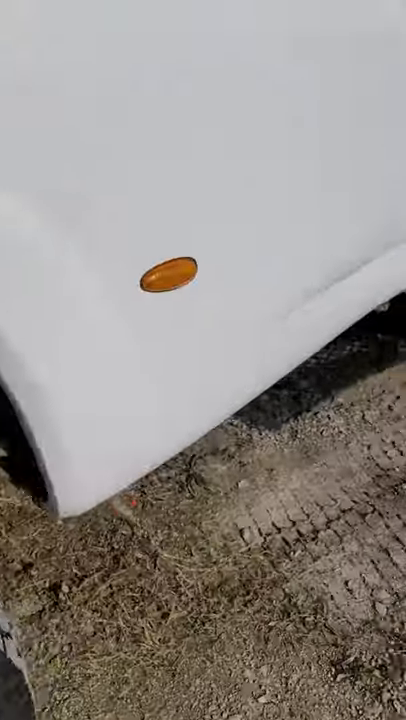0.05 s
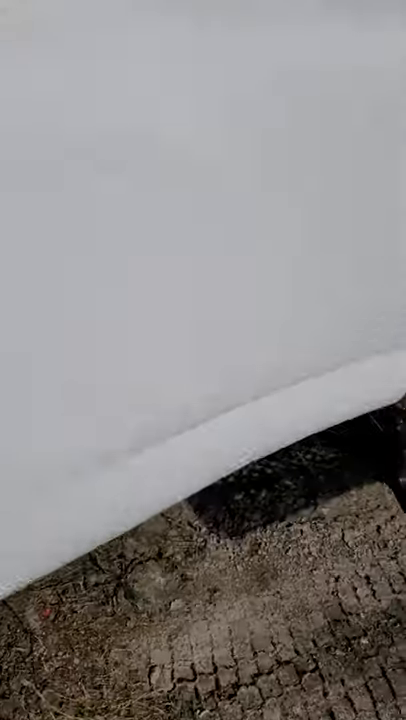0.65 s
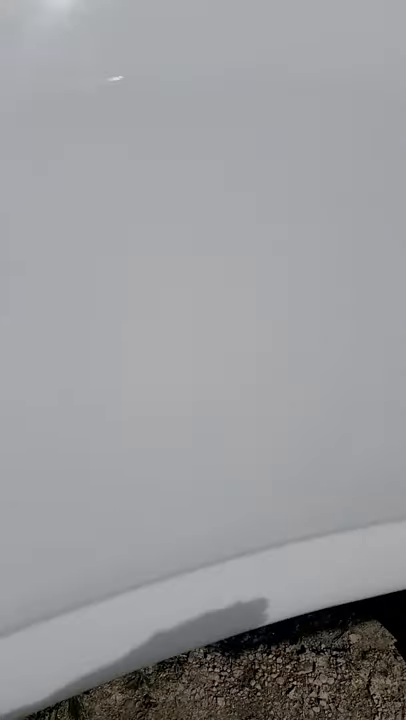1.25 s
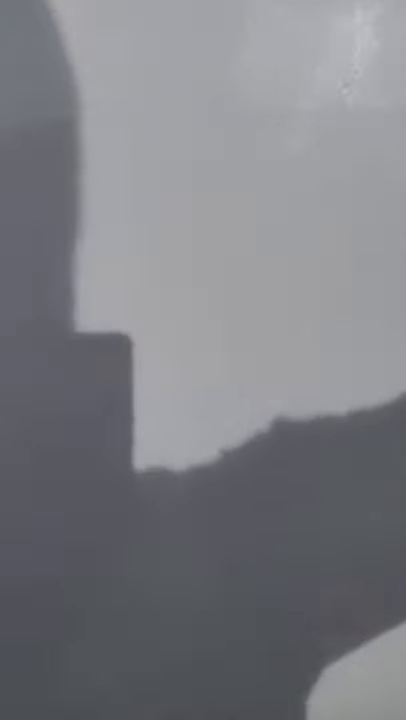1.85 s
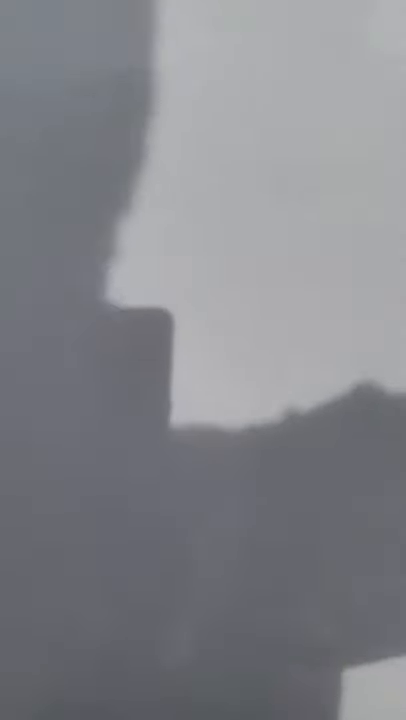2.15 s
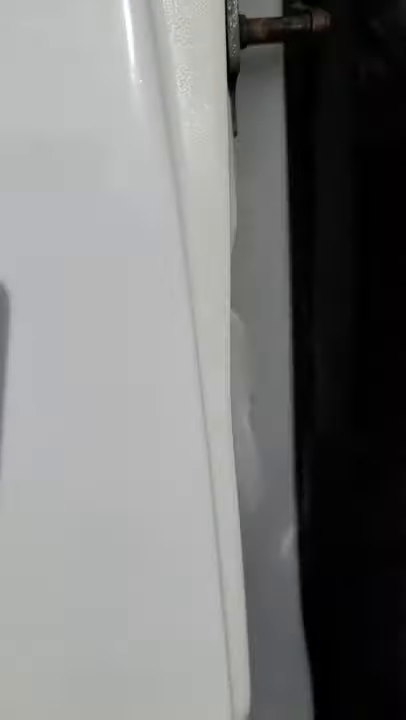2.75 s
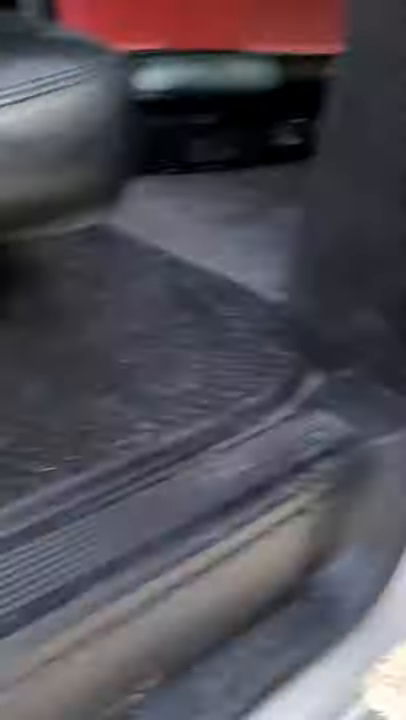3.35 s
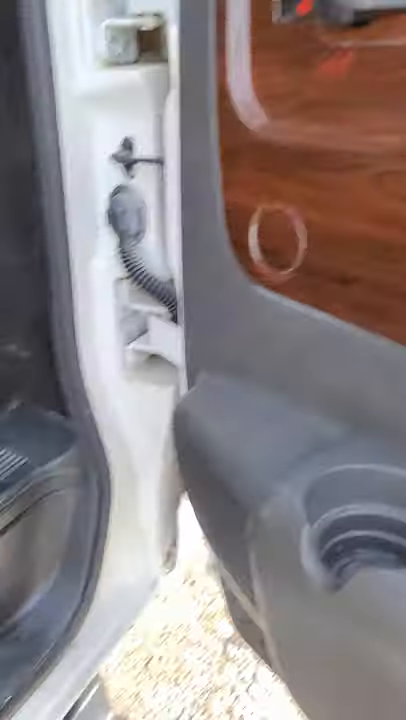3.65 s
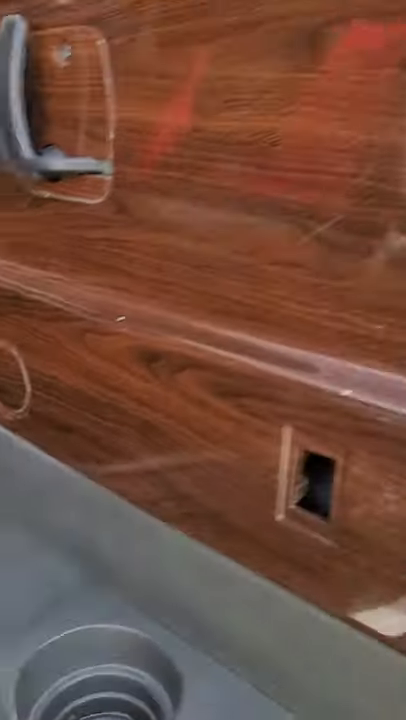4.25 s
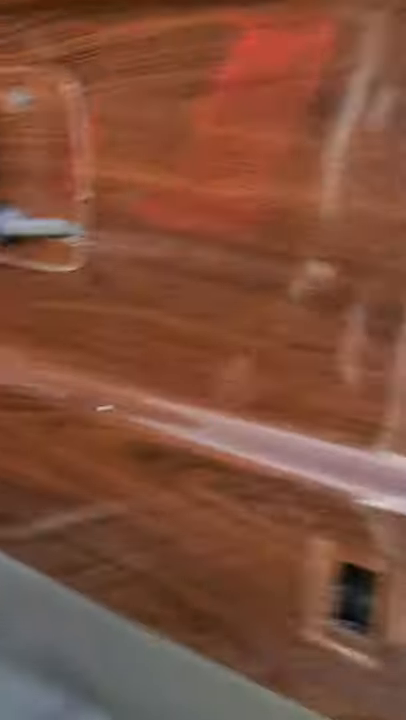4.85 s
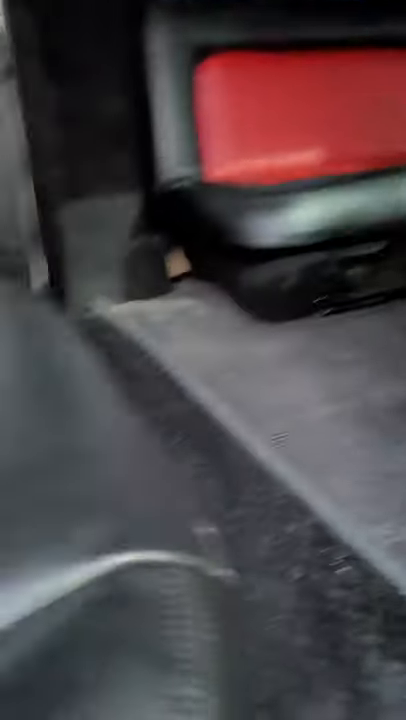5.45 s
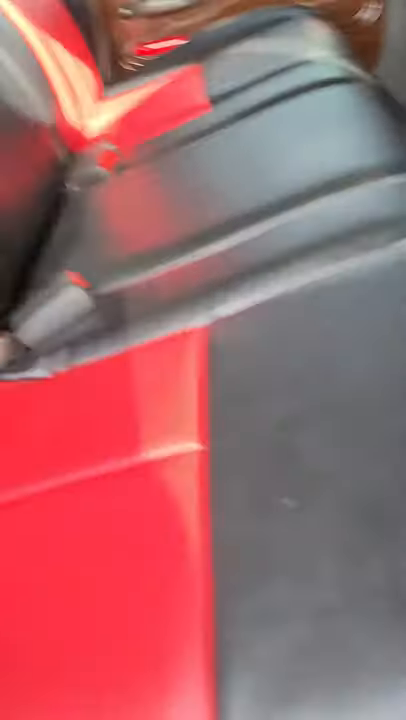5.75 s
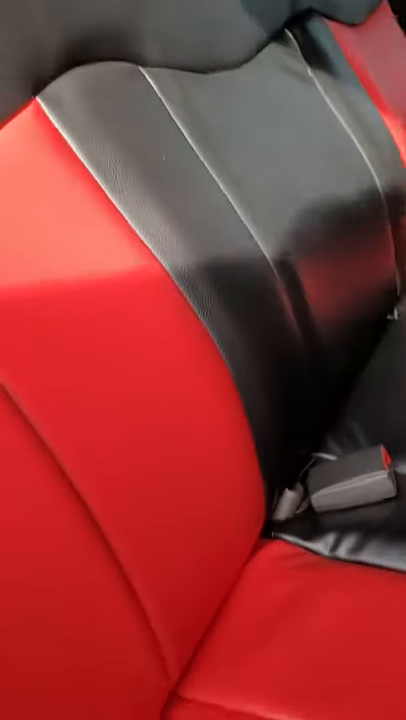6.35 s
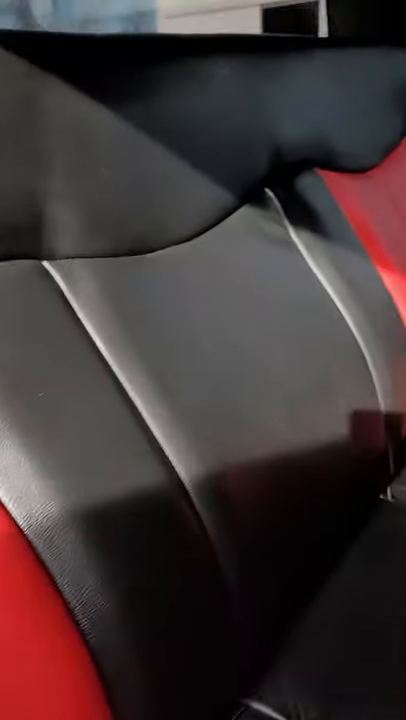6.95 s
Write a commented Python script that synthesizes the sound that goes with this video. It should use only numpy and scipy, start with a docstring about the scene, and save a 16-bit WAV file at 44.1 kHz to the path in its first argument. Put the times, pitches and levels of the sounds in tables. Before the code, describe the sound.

Over an idling engine and low wind rumble, a car door is opened with clicks and clunks, followed by knocks and soft clothing rustle.

```python
"""Opening a limousine door

Someone with a phone walks up, pulls the handle, swings the door open and leans inside.
The latch lets go with a thump, catch and hinge stay clack in the door shell, trim ticks, clothes rub.
An engine drones steadily outside and light wind buffets the microphones."""
import sys
import numpy as np
from scipy import signal
from scipy.fft import rfft, irfft
from scipy.io import wavfile
from scipy.ndimage import uniform_filter1d

SR = 44100
rng = np.random.default_rng(int(sys.argv[2]) if len(sys.argv) > 2 else 0)


def transcribe(u):
    """Save the signal u as a 16-bit wav file named by the first command-line argument.

    u: samples, shape (n,) or (channels, n), limited to [-1, 1]; the rate is SR.
    q: integer samples, one column per channel.
    """
    v = np.clip(np.atleast_2d(u).T, -1, 1)
    q = np.round(v * 32767).astype(np.int16)
    wavfile.write(sys.argv[1], SR, q)


N = 317696
TIME_S = np.arange(N) / SR
RING_TIME_S = TIME_S[:SR // 2]
FREQ_HZ = np.maximum(np.fft.rfftfreq(N, 1 / SR), 1)


def undb(db):
    """Decibels to gain."""
    return 10 ** (np.asarray(db) / 20)


def unit(x):
    """Scale to rms 1."""
    return x / np.sqrt(np.mean(x ** 2))


def curve(points):
    """Level in dB per sample from (s, dB) points."""
    return np.interp(TIME_S, *np.transpose(points))


def colour(points):
    """Gain per frequency from (Hz, dB) points."""
    hz, db = np.transpose(points)
    return undb(np.interp(np.log(FREQ_HZ), np.log(hz), db))


def band(low_hz, high_hz, order=6):
    """Gain per frequency of a band-pass."""
    return 1 / np.sqrt((1 + (low_hz / FREQ_HZ) ** (2 * order)) * (1 + (FREQ_HZ / high_hz) ** (2 * order)))


def resonances(peaks):
    """Gain per frequency from (Hz, width Hz, dB) peaks."""
    return undb(sum(db / (1 + (2 * (FREQ_HZ - hz) / width) ** 2) for hz, width, db in peaks))


def noise(gain, correlation):
    """Coloured stereo noise, mid signal at rms 1."""
    mid, side = rfft(rng.standard_normal((2, N))) * gain
    correlation = np.clip(correlation, -0.9, 0.99)
    mid = irfft(mid * np.sqrt(1 + correlation), N)
    side = irfft(side * np.sqrt(1 - correlation), N)
    return np.array([mid + side, mid - side]) / np.std(mid)


def pan(left_db):
    """Left and right gains with mean 1."""
    gains = undb(np.array([[left_db], [-left_db]]) / 2)
    return gains / gains.mean()


def wander(rate_hz):
    """Smooth random drift, rms 1."""
    hold = int(SR / rate_hz)
    steps = np.repeat(rng.standard_normal(N // hold + 1), hold)
    return unit(uniform_filter1d(steps, hold)[:N])


def add(out, start_s, sound):
    """Mix a sound in at start_s."""
    i = int(start_s * SR)
    out[:, i:i + sound.shape[1]] += sound[:, :N - i]


def burst(source, start_s, db, t60_s, rise_s, tail_db=-20, tail_stretch=3.7):
    """Crowded modes swell and die away, with a weaker, longer cabin tail."""
    t = RING_TIME_S
    fade = undb(-60 * t / t60_s) + undb(tail_db - 60 * t / (t60_s * tail_stretch))
    x = source[:, int(start_s * SR):][:, :len(t)] * fade * (1 - np.exp(-t / rise_s))
    return undb(db) * x * np.linalg.norm(fade) / np.linalg.norm(x.mean(0))


def ring(modes, rise_s=0.00043):
    """Decaying (Hz, dB, t60 s) modes; higher ones differ more in phase between channels."""
    t, out = RING_TIME_S, 0
    for hz, db, t60_s in modes:
        phase = 2 * np.pi * (rng.random() + min(hz / 4000, 0.5) * rng.random((2, 1)))
        out = out + undb(db - 60 * t / t60_s) * np.sin(2 * np.pi * hz * t + phase)
    return out * (1 - np.exp(-t / rise_s))


def hiss(gain_db=3):
    """Faint treble hiss."""
    # Each row: time in seconds, level in dB before gain.
    levels = [(0.0, -79.5), (2.67, -80), (3.75, -85), (4.46, -75), (5.0, -79)]
    spectrum = colour([(7000, 2.5), (9500, -3), (13000, 4.5)]) * band(3500, 13000)
    return noise(spectrum, 0) * undb(curve(levels) + gain_db) * pan(-3.5)


def engine(hum_hz=92.8, hum_gain_db=1, drone_db=-45.5, fall_db_per_s=0.36):
    """An idling engine: wavering hum, and a broad drone that eases as the phone moves behind the door."""
    # Each row: time in seconds, level in dB before gain.
    hum_levels = [(0.0, -43), (1.0, -48.5), (2.15, -36.5), (2.32, -44), (3.85, -42.5), (4.11, -51),
                  (5.41, -49), (6.36, -62), (6.88, -49.5), (7.2, -55)]
    # Each row: frequency in Hz, density in dB.
    drone_spectrum = [(150, -28), (250, -1), (414, -4), (460, -3), (538, -5), (651, -1), (816, -5.5),
                      (1120, -6.5), (1640, -10.5), (2130, -18), (3910, -35.5), (6940, -45.5), (9830, -63),
                      (13700, -35), (16000, -52)]
    # Each row: centre in Hz, width in Hz, boost in dB.
    drone_peaks = [(730, 34, 1.5), (827, 160, 3.5), (1284, 400, 2.5)]
    phase = 2 * np.pi * np.cumsum(hum_hz + 1.278 * wander(6.7)) / SR
    hum = unit(np.sin(phase)) * undb(curve(hum_levels) + hum_gain_db + 1.5 * wander(8.2))
    correlation = np.interp(FREQ_HZ, [500, 1200, 2500], [0.8, 0.5, 0.05])
    drone = noise(colour(drone_spectrum) * resonances(drone_peaks) * band(258, 5000, order=3), correlation)
    drone *= undb(drone_db - fall_db_per_s * TIME_S + wander(12))
    return hum * pan(1.5) + drone * pan(1)


def wind(gain_db=7, gust_db=2.1):
    """Gusty rumble; the slowest eddies hit each microphone separately."""
    # Each row: frequency in Hz, density in dB.
    spectrum = [(12, -37), (20, -10), (49, 0), (74, -1), (97, -6), (119, -10), (177, -14.5), (211, -20.5),
                (366, -38.5), (400, -33), (520, -66), (880, -120)]
    # Each row: time in seconds, level in dB before gain.
    levels = [(0.0, -43), (0.98, -48), (2.04, -41.5), (5.05, -48.5), (5.55, -42.5), (5.81, -48),
              (6.72, -53.5), (6.96, -51), (7.2, -51.5)]
    correlation = np.interp(FREQ_HZ, [35, 120], [0.1, 0.65])
    rumble = noise(colour(spectrum) * band(24, 360, order=4), correlation)
    return rumble * undb(curve(levels) + gain_db + gust_db * wander(11)) * pan(1.4)


def puffs(band_ratio=1.59, centred_db=-36.5):
    """Short eddies and handling bumps, a few low cycles each; louder ones lean left."""
    # Each row: centre in seconds, level in dB, half length in seconds, band centre in Hz.
    eddies = [(0.085, -25, 0.018, 56), (0.18, -33, 0.012, 100), (0.266, -31.5, 0.014, 104),
              (0.813, -32, 0.021, 166), (1.401, -31.5, 0.02, 96), (1.533, -26.5, 0.035, 83.4),
              (2.374, -36, 0.011, 315), (2.616, -27, 0.0091, 107), (3.177, -26.5, 0.011, 81),
              (5.45, -22, 0.0096, 133), (5.487, -16.5, 0.016, 93), (6.039, -38.5, 0.038, 168),
              (6.906, -38.5, 0.049, 50)]
    out = np.zeros((2, N))
    for centre_s, db, half_s, hz in eddies:
        swell = np.exp(-((TIME_S - centre_s) / half_s) ** 2 / 2)
        eddy = noise(band(hz / band_ratio, hz * band_ratio, order=4), 0.56) * swell
        out += undb(db) * unit(eddy) * np.sqrt(np.mean(swell ** 2)) * pan(db - centred_db)
    return out


def rubbing(edge_s=0.098, flicker_db=1, body_db=-8, grain_db_per_db=0.1976):
    """Cloth fibres catch and slip; slow, dull strokes are grainier and stir the panel."""
    # Clothes and hand. Each row: start and end in seconds, level in dB, brightness in dB.
    strokes = [(.41, 0.61, -65, -3.5), (1.04, 1.248, -72, -3.5), (1.875, 2.064, -56, -17),
               (2.194, 2.283, -52.5, -12), (2.347, 2.48, -64, -11), (2.512, 3.015, -65.5, -14.5),
               (4.908, 5.45, -66.5, -5.5), (5.14, 5.37, -53.5, -11), (5.765, 5.816, -59, -14),
               (5.979, 6.09, -57, -15), (6.044, 6.114, -50, -10.5), (6.122, 6.17, -56.5, -8),
               (6.723, 7.076, -53.5, -1), (7.05, 7.245, -63, -9)]
    # Each row: frequency in Hz, density in dB.
    cloth_spectrum = [(1400, 4), (2150, -0.5), (2460, -1), (2830, -1), (3300, -3), (5000, -7.5), (6200, -6),
                      (8700, -8.5)]
    # Each row: centre in Hz, width in Hz, boost in dB.
    upholstery_peaks = [(2770, 370, 4), (6300, 900, 2), (13500, 3500, 4.5)]
    creak = resonances(upholstery_peaks)
    treble = noise(colour(cloth_spectrum) * creak * band(910, 7500), -0.072) * pan(-1.1)
    top = noise(creak * band(8100, 24000), 0) * pan(-9.5)
    body = noise(band(200, 840, order=2), 0.51) * undb(body_db)
    out, catch = np.zeros((2, N)), wander(350)
    for start_s, end_s, db, bright_db in strokes:
        span = slice(int(start_s * SR), int(end_s * SR))
        t = TIME_S[span]
        ramp = np.minimum(t - start_s, end_s - t) / min(edge_s, (end_s - start_s) / 2)
        contact = np.sin(np.pi / 2 * np.clip(ramp, 0, 1))
        grain_db = -grain_db_per_db * bright_db * catch[span]
        friction = undb(-bright_db) * body[:, span] + treble[:, span] + undb(bright_db) * top[:, span]
        out[:, span] += undb(db + grain_db) * contact * friction
    return out * undb(flicker_db * wander(1500))


def ticks(treble, top, t60_s=0.045, rise_s=0.0005, walk_s=1.3, grit_count=12):
    """Latch pawl and trim stir only the shell's treble; grit crunches faintly on the walk up."""
    # Each row: start in seconds, treble level in dB, top band against treble in dB.
    contacts = [(0.293, -69, 7), (1.2346, -64, -12), (1.759, -53.5, -19), (1.956, -48.5, -8),
                (2.0223, -50, -24), (2.0506, -50.5, -21), (2.1205, -37.5, -7.5), (2.2233, -48.5, -8),
                (2.9926, -53.5, -22), (4.0602, -70.5, 8.5), (4.376, -59, -5), (4.597, -52, -2),
                (5.2964, -32.5, -13), (5.3414, -55, -6), (5.384, -47.5, -8.5), (5.5683, -57.5, -10),
                (5.7737, -51.5, -18), (6.0212, -55, -14)]
    grit = [(when * walk_s, -73.5 + 5 * (2 * size - 1), 2.5) for when, size in rng.random((grit_count, 2))]
    out = np.zeros((2, N))
    for start_s, db, bright_db in contacts + grit:
        add(out, start_s, burst(treble, start_s, db, t60_s, rise_s))
        add(out, start_s, burst(top, start_s, db + bright_db, t60_s, rise_s))
    return out


def metalwork(stay_s=3.4195, stay_db=-18.5, loose_s=5.251, ping_t60_s=0.028):
    """The hinge stay drops into its notch, a loose piece rings on, small struck parts ping."""
    # Each row of both: frequency in Hz, level in dB (stay: relative to stay_db), t60 in seconds.
    stay_modes = [(700, -0.5, 0.098), (733, 1, 0.073), (1235, -2, 0.074), (1435, -2.5, 0.059),
                  (1990, -14.5, 0.059), (3470, -11.5, 0.036), (3830, -12, 0.053), (4480, -11.5, 0.024),
                  (4820, -14, 0.036), (5390, -11.5, 0.026)]
    loose_modes = [(4230, -42.5, 0.1), (7300, -49, .09), (11150, -46, 0.13)]
    # Each row: start in seconds, frequency in Hz, level in dB.
    pings = [(1.860, 3940, -28), (1.860, 2440, -31.5), (2.122, 6550, -29.5), (2.123, 1455, -30),
             (2.576, 1900, -29), (2.599, 2520, -29), (2.839, 6340, -34.5), (2.994, 1320, -30.5),
             (4.598, 5670, -42), (5.305, 2730, -25), (5.385, 2840, -37)]
    out = np.zeros((2, N))
    add(out, stay_s, undb(stay_db) * ring(stay_modes))
    add(out, loose_s, ring(loose_modes))
    for start_s, hz, db in pings:
        add(out, start_s, ring([(hz, db, ping_t60_s)]))
    return out


def latch_release(start_s=2.1203, gain_db=-5.5, seal_cutoff_hz=486):
    """The compressed seal shoves the freed door into its low modes; soft rubber passes no treble."""
    # Each row: frequency in Hz, relative level in dB, t60 in seconds.
    panel_modes = [(87, -11, 0.2), (131, 0, 0.069), (172, -14.5, 0.38), (311, -14, 0.07), (438, -8, 0.021),
                   (684, -2, 0.15)]
    out, t = np.zeros((2, N)), RING_TIME_S
    panel = sum(undb(db - 60 * t / t60_s) * np.cos(2 * np.pi * hz * t) for hz, db, t60_s in panel_modes)
    thump = signal.sosfilt(signal.butter(10, seal_cutoff_hz, fs=SR, output="sos"), panel)
    add(out, start_s, undb(gain_db) * thump[None])
    return out


def door(rise_s=0.0013, hand_damping=0.92):
    """Handle, catch and stay strike the hand-damped shell: dense clacks, ringing modes, light ticks."""
    # Each row: start in seconds, level in dB, weight in dB, bare sheet metal clack in dB.
    blows = [(1.858, -38.5, -4, 1.5), (2.171, -36, 1.5, -8), (2.573, -42, -5, 0), (2.59, -40, 2, -4),
             (2.67, -29.5, 2.5, 9), (2.84, -36.5, 3.5, -6), (3.418, -31, 0.5, 6), (5.164, -39, -0.5, -1),
             (5.187, -29, -8.5, -10.5), (5.202, -33.5, -2, 3.5), (5.299, -23, -4, -1)]
    # Each row: frequency in Hz, density in dB.
    shell_spectrum = [(47, -29), (80, 5), (217, 1.5), (563, -7.5), (802, 3.5), (1000, -7), (1560, -1.5),
                      (2080, -15.5), (3030, -17), (3320, -20.5), (3870, -22), (7050, -33.5), (9400, -54),
                      (14600, -44), (16000, -48)]
    # Each row: low and high edge in Hz, t60 in seconds before damping, left-right correlation.
    shell_bands = [(98, 226, 0.21, 1), (244, 567, 0.25, 0.69), (602, 2460, 0.09, -0.31),
                   (2280, 17000, 0.052, -0.0038), (8860, 10800, 0.043, 0)]
    # Each row, one per band: offset in dB, dB per dB of weight, dB per dB of clack.
    band_feeds = [(1, 1, -0.72), (0, 1.86, 0), (0, 0, 1), (0, 0, 0), (-14.5, 0, -0.7)]
    # Each row: frequency in Hz, relative level in dB, t60 in seconds before damping.
    shell_modes = [(168, 2.5, 0.11), (255, -25.5, 0.87), (408, -1.5, 0.049), (692, -25, 0.73),
                   (837, 7.5, 0.025), (1126, -3, 0.089), (1490, -22, .09), (1855, -6, 0.086),
                   (2263, -4.5, 0.066), (2530, -16, 0.085), (3020, -27, 0.21), (4350, -26, 0.046),
                   (7050, -8.5, 0.045)]
    shell = [noise(colour(shell_spectrum) * band(low_hz, high_hz), correlation)
             for low_hz, high_hz, _, correlation in shell_bands]
    shell[-1] *= pan(-1.5)
    log_centres = [np.log(low_hz * high_hz) / 2 for low_hz, high_hz, _, _ in shell_bands]
    out = np.zeros((2, N))
    for start_s, blow_db, weight_db, clack_db in blows:
        feeds_db = [db + heavy * weight_db + bare * clack_db for db, heavy, bare in band_feeds]
        clack = sum(burst(source, start_s, db, t60_s * hand_damping, rise_s)
                    for source, db, (_, _, t60_s, _) in zip(shell, feeds_db, shell_bands))
        # a mode rings as strongly as the blow feeds its band
        modes = [(hz, db + np.interp(np.log(hz), log_centres, feeds_db), t60_s * hand_damping)
                 for hz, db, t60_s in shell_modes]
        add(out, start_s, undb(blow_db) * (clack + ring(modes)) * pan(0.2))
    return out + ticks(treble=shell[-2], top=shell[-1])


def scene():
    """Everything at the phone's two microphones."""
    return door() + latch_release() + metalwork() + rubbing() + puffs() + wind() + engine() + hiss()


def record(dry, cutoff_hz=15950):
    """The phone cuts the top treble."""
    return signal.sosfilt(signal.ellip(10, 0.2, 70, cutoff_hz, fs=SR, output="sos"), dry)


dry = scene()
out = record(dry)
transcribe(out)
```